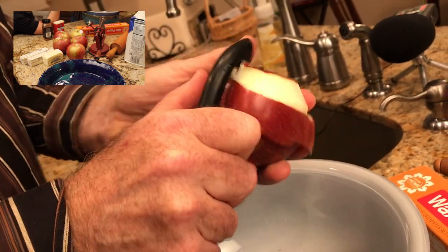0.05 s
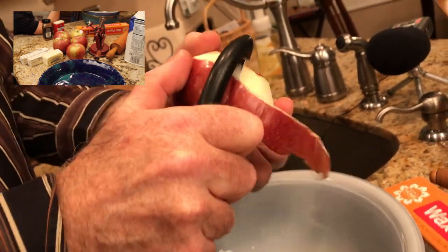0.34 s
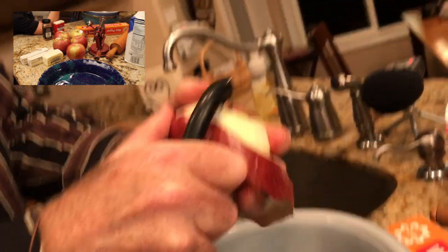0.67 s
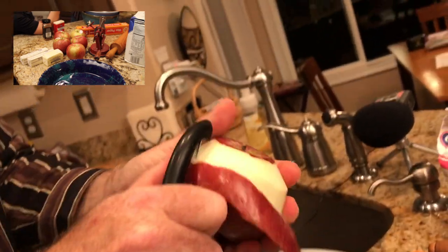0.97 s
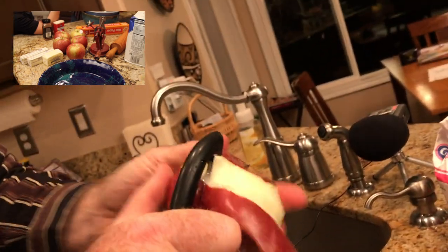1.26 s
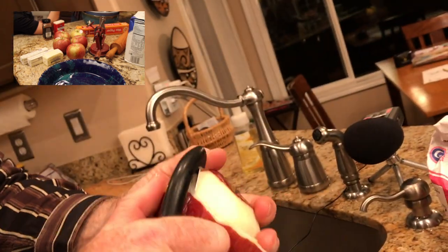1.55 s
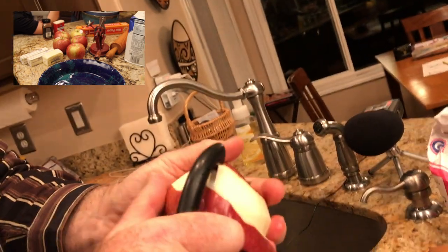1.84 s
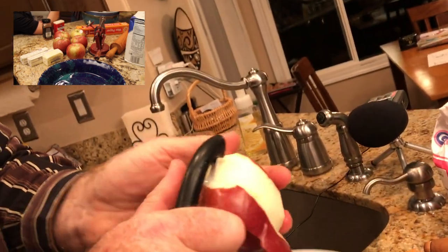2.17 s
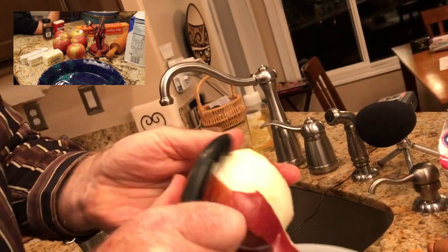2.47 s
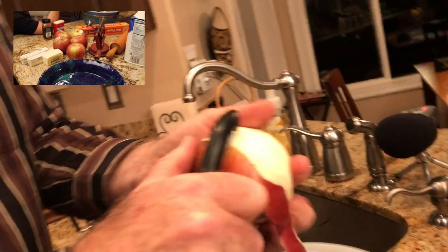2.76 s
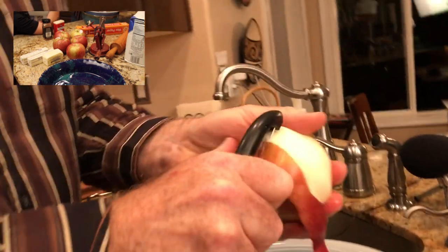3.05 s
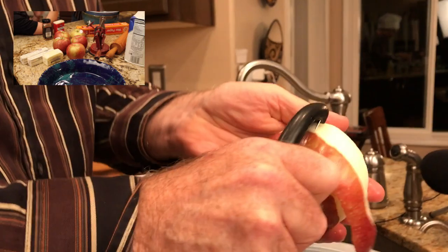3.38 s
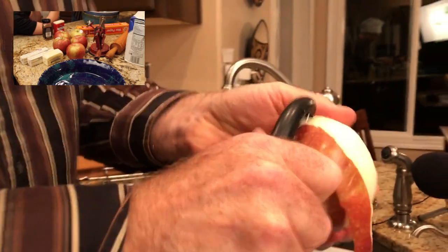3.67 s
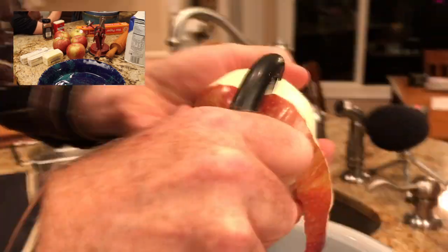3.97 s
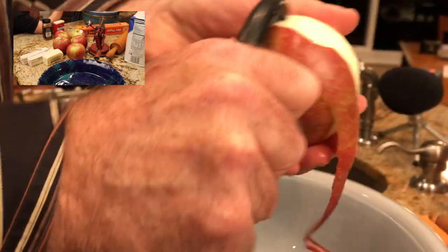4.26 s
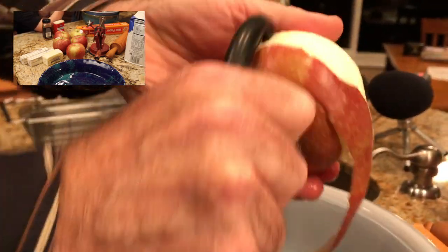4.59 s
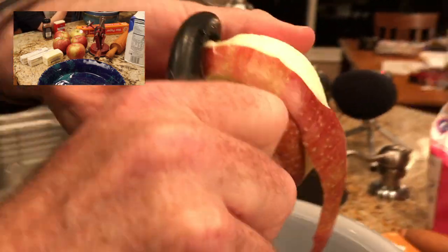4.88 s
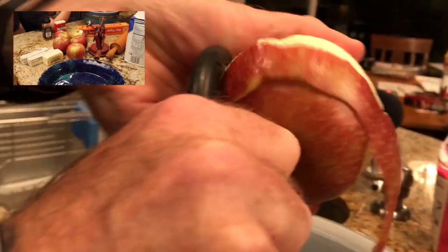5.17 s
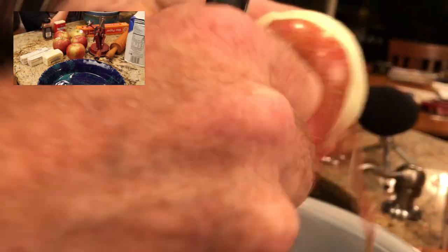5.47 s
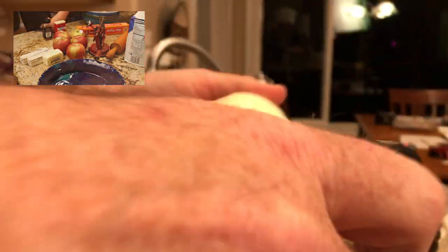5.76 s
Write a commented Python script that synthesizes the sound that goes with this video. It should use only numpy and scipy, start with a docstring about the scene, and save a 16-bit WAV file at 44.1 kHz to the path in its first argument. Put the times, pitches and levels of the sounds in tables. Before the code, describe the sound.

Juicy, crunchy scrapes come in uneven strokes as an apple is peeled close to the microphone, over low kitchen room noise. The microphone gets jostled throughout, most loudly in one muffled thump and rumble of cloth after the halfway point. The strokes go on, followed by a small rattle of the peeler, two light hollow knocks on a plastic bowl and a last dull rub.

```python
"""In a quiet kitchen, a hand peeler shaves an apple in short wet strokes over a plastic bowl.
The blade bursts tiny fruit cells and snaps the skin; late on it rattles, and the bowl is knocked.
The camera rides on the person peeling: it is bumped, once with a long dull thump, its case clicks,
and cloth rubs on it. Near sounds mostly push one of its two microphones while they pull the other
(opposite polarity), so they seem very wide."""
import sys
import numpy as np
from scipy import signal
from scipy.fft import rfft, irfft, next_fast_len
from scipy.io import wavfile
from scipy.ndimage import uniform_filter1d, map_coordinates

SR = 44100
rng = np.random.default_rng(int(sys.argv[2]) if len(sys.argv) > 2 else 0)


def store_pcm(level_fs):
    """Save levels as 16-bit WAV."""
    pcm = np.round(np.clip(level_fs, -1, 1) * 32767).astype(np.int16)
    wavfile.write(sys.argv[1], SR, np.atleast_2d(pcm).T)


N = 256969


def amp(db):
    """Turn decibels into a number to multiply by."""
    return 10 ** (np.asarray(db) / 20)


def unit(x):
    """Scale a signal to an average (rms) size of 1."""
    return x / np.sqrt(np.mean(x ** 2) + 1e-20)


def along(points, hz):
    """Read between (f/Hz, value) points, on a log frequency scale."""
    f, v = np.transpose(points)
    return np.interp(np.log(hz + 1), np.log(f + 1), v)


def curve(rows):
    """Join (t/s, value) points into one value per sample."""
    return np.interp(np.arange(N) / SR, *np.transpose(rows))


def wobble(rate):
    """A smooth curve through `rate` random values a second."""
    values = rng.standard_normal(int(N * rate / SR) + 4)
    return map_coordinates(values, [np.arange(N) * rate / SR])


def filtered(x, response):
    """Multiply each frequency in x by response(hz)."""
    size = next_fast_len(N + SR // 2)
    return irfft(rfft(x, size) * response(np.fft.rfftfreq(size, 1 / SR)), size)[..., :N]


def coloured(x, points, size=8192):
    """Give x the tone colour of (f/Hz, level/dB) points."""
    gain = amp(along(points, np.fft.rfftfreq(size, 1 / SR)))
    cepstrum = irfft(np.log(gain))
    # folding this makes the filter ring only after a sound, never before it
    cepstrum[1:size // 2] *= 2
    cepstrum[size // 2 + 1:] = 0
    return signal.fftconvolve(x, irfft(np.exp(rfft(cepstrum))))[:N]


def grains(rate, spread_db):
    """Tiny random clicks of uneven size, about `rate` a second."""
    hits = rng.random(N) < rate / SR
    return unit(hits * rng.choice([-1, 1], N) * amp(spread_db * rng.standard_normal(N)))


def stereo(mid, side, right_db):
    """Make left and right from the part they share (mid) and the part they hear opposite (side)."""
    return np.array([(mid + side) * amp(-right_db / 2), (mid - side) * amp(right_db / 2)])


def add(track, s, sound):
    """Mix a sound into a track, starting at s seconds."""
    part = track[round(s * SR):][:len(sound)]
    part += sound[:len(part)]


def kitchen_air():
    """The quiet kitchen makes a low, even noise."""
    # the noise's tone colour: f/Hz, level/dB
    colour = [(35, -0.5), (70, -7.5), (140, -10), (200, -14.5), (380, -19), (950, -29.5), (1400, -31.5),
              (3000, -37), (9000, -42), (16000, -41.5)]
    # extra gain for its side part: f/Hz, level/dB
    width = [(40, 4), (90, 10.5), (150, -2), (350, 3.5), (600, 4), (4000, -3.5), (12000, -1)]
    mid = unit(coloured(rng.standard_normal(N), colour))
    side = unit(coloured(rng.standard_normal(N), colour))
    side = filtered(side, lambda hz: amp(along(width, hz)))
    return amp(-55.5) * stereo(mid, side, right_db=0.1215)


def peeling(slide_db=-74, crunch_db=-10):
    """The blade bursts thousands of cells a second over a juicy hiss; close up, the hands ring along."""
    # strokes of the blade: t/s at full bite, rise/s per 20 dB, hold/s, level/dB
    strokes = [(0.003, 2.6276, 0.05, -49), (0.33, 0.0078, 0.1467, -69), (0.7, 0.125, 0.03, -50.3),
               (0.865, 0.06, 0.125, -47.5), (1.393, 0.1532, 0.1724, -59), (1.54, 0.0119, 0.13411, -55.5),
               (2.02, 0.115, 0.095, -48.5), (2.532, 0.095, 0.0066, -43.7), (2.702, 0.0449, 0.06514, -69),
               (3.05, 0.026, 0.136, -47.2), (3.53, 0.033, 0.085, -48.8), (3.725, 0.06, 0.035, -59.5),
               (4.185, 0.125, 0.025, -45.7), (4.5, 0.42, 0.07, -62), (4.572, 0.036, 0.03, -46),
               (4.657, 0.0243, 0.05808, -56), (4.86, 0.5249, 0.05874, -70), (5.011, 0.0503, 0.09, -50.8),
               (5.268, 0.08, 0.11, -58.6)]
    # how near the hands are to the camera: t/s, nearness from 0 to 1
    nearness = [(0, 0.0), (3.4, 0.23), (4.2, 0.61), (5.1, 1.0), (5.83, 0.35)]
    # tone colour of bursting fruit cells: f/Hz, level/dB
    flesh = [(150, -42.5), (550, -17), (850, -7), (1800, -2), (3100, -4), (4400, 0), (6200, 1),
             (8000, -0.5), (11000, -0.5), (14000, -6.5), (16000, -18)]
    # tone colour of firm flesh breaking under a deep bite: f/Hz, level/dB
    firm_flesh = [(700, -35), (1100, -7), (1900, 0), (3200, -8), (5500, -3), (11000, -18)]
    # how the hollow between hands and apple rings: f/Hz, width/Hz, level/dB
    hollow_tones = [(919.6, 200, 4.5), (2219.2, 830.7, -3.5)]
    # extra gain for the scrape's side part: f/Hz, level/dB
    width = [(300, 0), (900, 10), (2000, 7), (4400, 5), (7000, 3), (12000, 1.5)]
    # the scrape's extra lean to the right: f/Hz, right minus left/dB
    lean = [(300, 5.5), (900, 4.5), (2500, 4), (6000, 0), (12000, 1)]

    def hollow(f):
        """The cupped hands favour the frequencies near their own tones."""
        return sum(amp(db) * 1j * f * w / (c * c - f * f + 1j * f * w) for c, w, db in hollow_tones)

    near = curve(nearness)
    # the blade eases off while it cuts, then runs out
    effort = gestures(strokes, sag_db_per_s=11.5, release_db_per_s=174)
    effort = np.hypot(effort, amp(slide_db))  # between strokes the apple turns in the fingers
    cut = effort * amp(0.8 * wobble(60) + 0.5 * wobble(330))  # the blade catches and slides
    crackle = grains(rate=400, spread_db=2.5)  # the larger bursts reach both microphones
    depth = amp(crunch_db) * effort / effort.max()  # the deeper the bite, the more it crunches
    paths = []
    for _ in range(2):  # mid, then side
        cells = grains(rate=2600, spread_db=0.0) + .5 * rng.standard_normal(N)
        cells += .5 * crackle * rng.choice([-1, 1], N)
        tear = nearby(coloured(cells, flesh), echo_db=-14)
        tear = unit(patchy(tear, depth_db=3.0))
        crunch = unit(coloured(grains(rate=900, spread_db=2.0), firm_flesh))
        paths.append(cut * (tear + near * filtered(tear, hollow) + depth * crunch))
    mid, side = paths
    side = filtered(side, lambda hz: amp(along(width, hz))) * amp(2.406 * near)
    scrape = stereo(mid, side, right_db=1) + amp(-16) * room(side)
    return filtered(scrape, lambda hz: amp(np.outer([-.5, .5], along(lean, hz))))


def gestures(rows, sag_db_per_s, release_db_per_s):
    """The strength of a series of pushes: each swells, sags while it is held, then dies away."""
    gain = np.zeros(N)
    for s, rise, hold, db in rows:
        t = np.arange(N) / SR - s
        fall = sag_db_per_s * np.clip(t, 0, hold) + release_db_per_s * np.maximum(t - hold, 0)
        gain = np.hypot(gain, amp(db + 20 * np.minimum(t, 0) / rise - fall))
    return gain


def nearby(x, echo_db, drift_s=.0003):
    """Hands, bowl and counter send back quick, weak echoes whose delays drift as the apple turns."""
    t = np.arange(N) / SR
    delays = rng.uniform(.0006, .008, size=6)
    return x + amp(echo_db) * sum(np.interp(t - d - drift_s * wobble(3), t, x) for d in delays)


def patchy(x, depth_db):
    """The shifting fingers make narrow bands of the sound swell and fade, less so in the treble."""
    hz, _, spectra = signal.stft(x, SR, nperseg=1024)
    patches = uniform_filter1d(rng.standard_normal(spectra.shape), size=5, axis=0)  # smooth in pitch
    patches = uniform_filter1d(patches, size=9, axis=1)  # and in time
    reach = 1 / (1 + (hz[:, None] / 11000) ** 2)
    return signal.istft(spectra * amp(depth_db * reach * unit(patches)), nperseg=1024)[1][:N]


def room(x):
    """The kitchen's echo at each microphone; high sounds die first."""
    # how long the kitchen rings: f/Hz, t60/s (t60 is the time to fade by 60 dB)
    ring_times = [(200, 0.5407), (2000, 0.3408), (12000, 0.3376)]
    hz, t, spectra = signal.stft(rng.standard_normal((2, SR // 2)), SR, nperseg=256)
    fade = amp(-60 * t / along(ring_times, hz)[:, None])
    tail = signal.istft(spectra * fade, SR, nperseg=256)[1]
    return signal.fftconvolve(x[None], tail / np.linalg.norm(tail[0]), axes=1)[:, :N]


def bumps(tap_t60=0.06473, chatter=0.06315, lurch_hz=32.977):
    """Each bump rocks the camera for a few low cycles and taps its case; a lurch swings it more slowly."""
    # bumps on the camera: t/s, thud level/dB, thud f/Hz, tap level/dB
    hits = [(0.104, -27, 120, -39.5), (0.141, -33, 100, -46), (0.346, -27, 110, -47),
            (0.362, -30, 100, -41), (0.407, -36, 150, -34), (0.469, -26, 110, -42),
            (0.546, -43.5, 125.1, -39), (0.894, -23, 125, -32.5), (0.91, -32, 120, -40),
            (1.066, -37, 109.3, -36), (1.21, -24.5, 135.1, -49), (1.283, -28, 150.4, -32),
            (1.296, -38, 99.74, -36.5), (1.844, -38, 110.2, -48), (3.583, -23, 125, -33),
            (3.594, -24, 150, -24), (3.641, -20, 125, -38), (3.723, -14.5, 102, -41),
            (3.757, -11, 108, -41), (3.789, -18, 115, -40), (4.125, -29, 150, -47),
            (4.141, -24.5, 125, -50), (4.942, -27, 130, -30), (4.983, -15, 145, -45),
            (5.566, -31, 58.96, -31.5), (5.662, -24, 150, -42)]
    # slow lurches of the camera: t/s, level/dB
    lurches = [(1.2, -32), (3.778, -13), (4.82, -25.5), (5.72, -23)]
    # tone colour of a tap on its case: f/Hz, level/dB
    case = [(60, -29.5), (200, -3.5), (370, 3.5), (560, 3), (1000, -9), (1400, -20.5), (2200, -26.5),
            (9000, -49.5)]
    t = np.arange(SR // 5) / SR
    tap_peak = np.abs(coloured(np.ones(1), case)).max()
    paths = []
    for thud_share, tap_share in [(.4, 0.6221), (.9, 1.0)]:  # mid, then side
        thuds, taps = np.zeros(N), np.zeros(N)
        for s, thud_db, hz, tap_db in hits:
            add(thuds, s, amp(thud_db) * swing(hz, cycles=5.449, rise_s=0.001374, uneven=0.8627))
            tail = chatter * rng.standard_normal(len(t)) * amp(-60 * t / tap_t60)
            add(taps, s, amp(tap_db) * ((t == 0) + tail))
        for s, db in lurches:
            add(thuds, s, amp(db) * swing(lurch_hz, cycles=5.696, rise_s=0.004845, uneven=0.443))
        paths.append(thud_share * thuds + tap_share * coloured(taps, case) / tap_peak)
    mid, side = paths
    # the shared part travels through the case and arrives a millisecond later
    return stereo(np.roll(mid, SR // 1000), side, right_db=1.5)


def swing(hz, cycles, rise_s, uneven):
    """A few dying swings on a soft mount that gives way unevenly, so they have no clear pitch."""
    t = np.arange(SR // 5) / SR
    turns = hz * t
    drift = np.interp(turns, np.arange(40) / 2, rng.standard_normal(40))
    fade = amp(-30 * turns / cycles)
    return np.sin(2 * np.pi * turns + uneven * drift) * (1 - np.exp(-t / rise_s)) * fade


def rubbing():
    """Cloth sticks and slips on the camera in lumps, and the camera's body passes only a dull rumble."""
    # drags of the cloth: t/s at full pressure, rise/s per 20 dB, hold/s, level/dB
    drags = [(0.35, 0.0408, 0.14794, -48), (0.9, 0.0522, 0.01016, -44), (3.595, 0.0317, 0.085, -34.5),
             (3.765, 0.05, 0.04, -34), (3.86, 0.1, 0.095, -32.5), (4.14, 0.07, 0.02, -43),
             (5.675, 0.14, 0.05, -34)]
    # tone colour of the rub that both microphones share: f/Hz, level/dB
    mid_colour = [(15, -14), (32, 0), (70, -11), (140, -5.5), (190, -11.5), (330, -9), (430, -19.5),
                  (600, -23.5), (760, -35), (1400, -46), (4000, -81.5)]
    # tone colour of the rub that they hear opposite: f/Hz, level/dB
    side_colour = [(15, -9), (40, -4), (95, -2), (145, -2.5), (195, -12), (340, -23), (520, -16),
                   (720, -32), (950, -28), (1300, -45.5), (4000, -83)]
    # the cloth loses grip, then slides off
    drag = gestures(drags, sag_db_per_s=18.5, release_db_per_s=194) * amp(0.8 * wobble(55))
    slips = lambda: grains(rate=400, spread_db=2.0) + .5 * rng.standard_normal(N)
    mid = amp(-3.5) * unit(coloured(slips(), mid_colour))
    side = amp(1.5) * unit(coloured(slips(), side_colour))
    return drag * stereo(mid, side, right_db=2.0)


def skin_snaps(rise_s=0.001365):
    """The skin gives way with short bright cracks; sticky fingers tick faintly in between."""
    # snaps of the skin at the blade: t/s, level/dB, t60/s
    snaps = [(1.33, -51, 0.04), (1.391, -36, 0.06), (1.466, -35, 0.03), (1.539, -41, 0.0599),
             (1.658, -42.5, 0.04195), (3.047, -45, 0.048), (3.345, -51, 0.0307), (5.008, -35, 0.04657),
             (5.35, -45, 0.03)]
    track = amp(-80) * grains(rate=10, spread_db=3)  # the sticky fingers
    t = np.arange(SR // 10) / SR
    for s, db, t60 in snaps:
        add(track, s, amp(db - 60 * t / t60) * (1 - np.exp(-t / rise_s)) * rng.standard_normal(len(t)))
    crack = coloured(track, [(500, -9), (1500, -4.0), (6000, -3.0), (11000, -2), (16000, -5)])
    return stereo(0.9373 * crack, np.roll(crack, 5), right_db=-4) + amp(-8.5) * room(crack)


def case_clicks(crack_db=-10, crack_t60=0.00289):
    """The camera's plastic case flexes and ticks twice: a crack and a short high ring over a small knock."""
    # clicks of the case: t/s, level/dB
    clicks = [(3.667, -31.5), (3.670, -28.5)]
    # the tones the case rings with: f/Hz, level/dB, t60/s
    tones = [(288.15, 2, 0.03142), (1570.2, -2, 0.003823), (10868, -0.5, 0.002192)]
    track, t = np.zeros(N), np.arange(SR // 20) / SR
    for s, db in clicks:
        ring = sum(amp(level - 60 * t / t60) * np.sin(2 * np.pi * hz * t) for hz, level, t60 in tones)
        crack = amp(crack_db - 60 * t / crack_t60) * rng.standard_normal(len(t))
        add(track, s, amp(db) * (ring + crack))
    return np.array([track, track])


def blade_rattles(crack_db=-5, crack_t60=0.012):
    """The loose blade clicks in its handle as it is set back on the apple."""
    # clicks of the blade: t/s, level/dB, lowest f/Hz set ringing, longest t60/s allowed
    clicks = [(4.838, -48, 1000, 0.04), (4.879, -39.5, 600, 0.1)]
    # the tones the peeler rings with: f/Hz, level/dB, t60/s
    tones = [(680, 2, 0.09), (1140, -3, 0.028), (1300, -0.5, 0.04), (1780, -7, 0.025)]
    track, t = np.zeros(N), np.arange(SR // 5) / SR
    for s, db, lowest_hz, longest_t60 in clicks:
        crack = amp(crack_db - 60 * t / crack_t60) * rng.standard_normal(len(t))
        add(track, s, amp(db) * (struck(tones, t, lowest_hz, longest_t60) + crack))
    track = coloured(track, [(1700, 0), (4000, -18)])
    return stereo(-.7 * track, .7 * track, right_db=0) + amp(-12) * room(track)


def struck(tones, t, lowest_hz, longest_t60):
    """A struck thing rings with its own tones; the contact misses low ones and cuts long ones short."""
    ring = np.zeros(len(t))
    for hz, db, t60 in tones:
        missed_db = 10 * np.log10(1 + (lowest_hz / hz) ** 16)
        start_db = db - missed_db + rng.normal(0, 1)
        ring += amp(start_db - 60 * t / min(t60, longest_t60)) * np.sin(2 * np.pi * hz * t)
    return ring


def bowl_knocks(rise_s=0.0016, contact_t60=0.04, clunk_db=-2):
    """A knock sets the hollow bowl ringing, with a thin high tone that lingers, over a faint clunk."""
    # knocks on the bowl: t/s, level/dB
    knocks = [(5.118, -35), (5.347, -31)]
    # the tones the bowl rings with: f/Hz, level/dB, t60/s
    tones = [(515, -9, 0.3), (572, -3.5, 0.18), (620, 10.5, 0.04), (700, 5, 0.045), (802, -11, 0.14),
             (1290, -14, 0.05), (1394, -26, 0.6), (1700, -18, 0.04)]
    track, t = np.zeros(N), np.arange(SR // 2) / SR
    for s, db in knocks:
        contact = rng.standard_normal(len(t)) * amp(clunk_db - 60 * t / contact_t60)
        clunk = coloured(contact, [(300, -1.5), (650, 9.5), (1700, -8), (4000, -18)])[:len(t)]
        ring = struck(tones, t, lowest_hz=0, longest_t60=1)
        add(track, s, amp(db) * (ring + clunk) * (1 - np.exp(-t / rise_s)))
    return stereo(-.7 * track, track, right_db=-2) + amp(-7) * room(track)


def scene():
    """Everything that reaches the two microphones."""
    apple = peeling() + skin_snaps()
    camera = bumps() + case_clicks() + rubbing()
    return apple + camera + bowl_knocks() + blade_rattles() + kitchen_air()


def record(dry, top_hz=15850):
    """The camera keeps nothing higher than top_hz."""
    return filtered(dry, lambda hz: hz < top_hz)


dry = scene()
out = record(dry)
store_pcm(out)
```